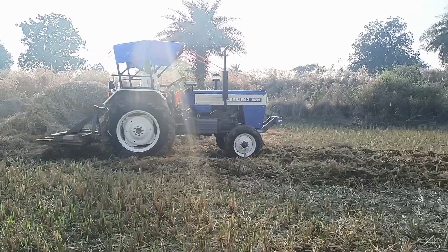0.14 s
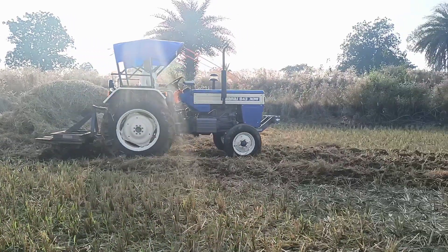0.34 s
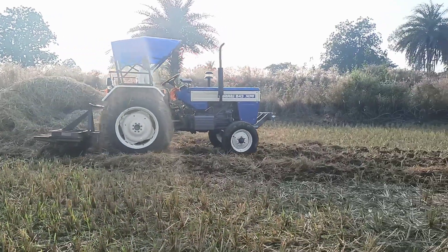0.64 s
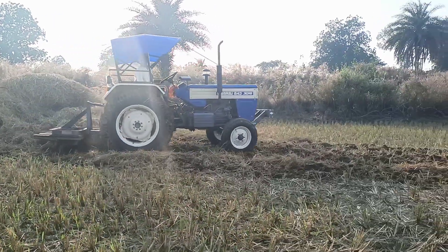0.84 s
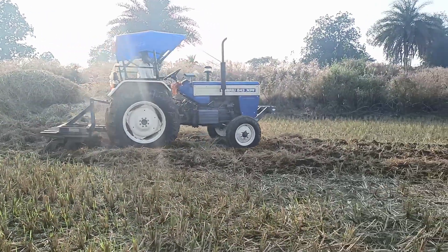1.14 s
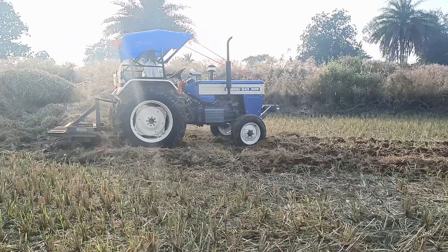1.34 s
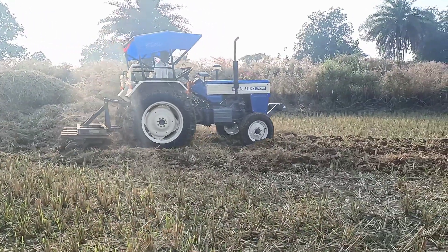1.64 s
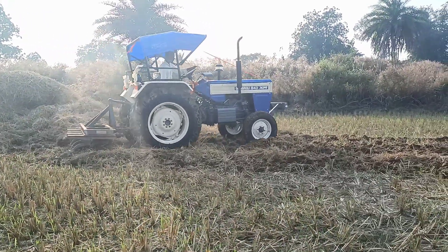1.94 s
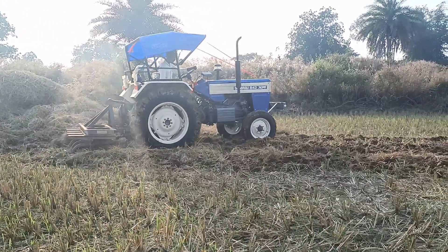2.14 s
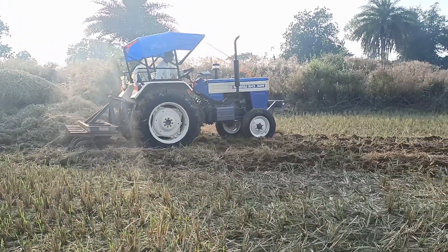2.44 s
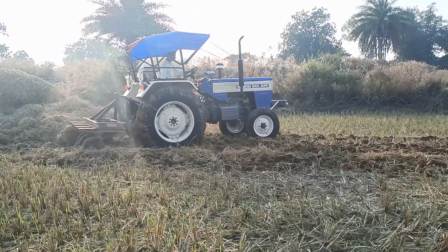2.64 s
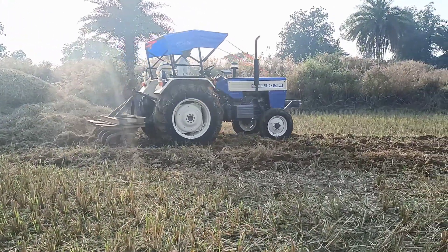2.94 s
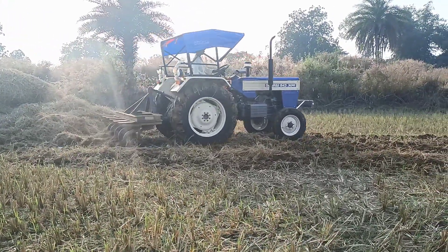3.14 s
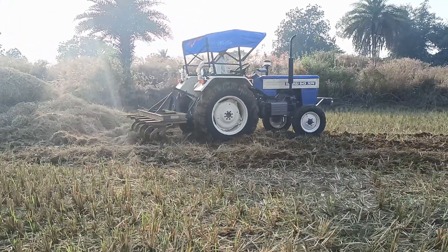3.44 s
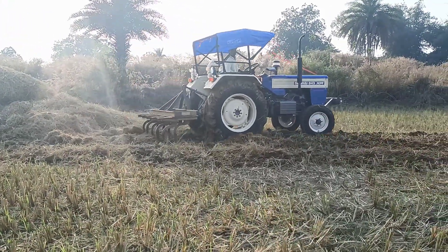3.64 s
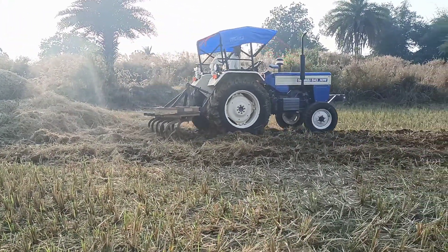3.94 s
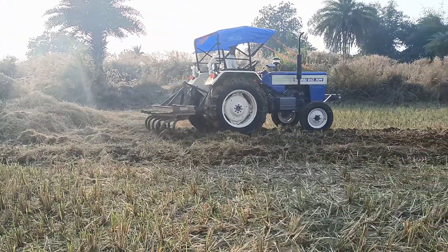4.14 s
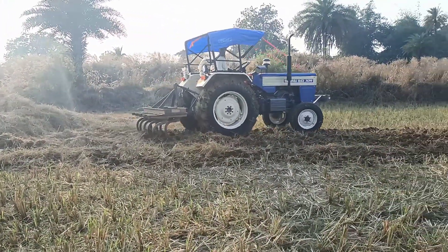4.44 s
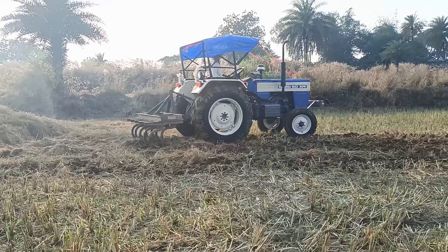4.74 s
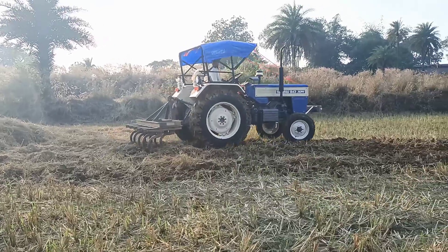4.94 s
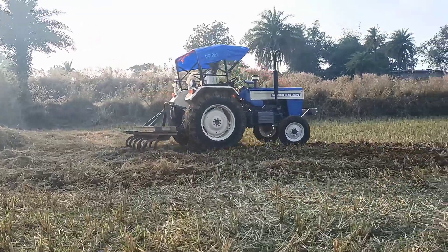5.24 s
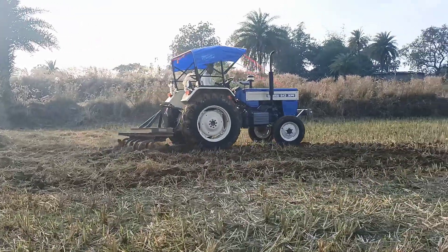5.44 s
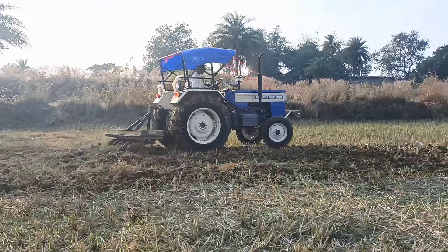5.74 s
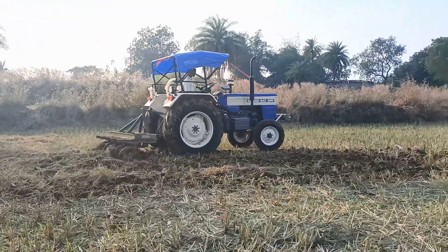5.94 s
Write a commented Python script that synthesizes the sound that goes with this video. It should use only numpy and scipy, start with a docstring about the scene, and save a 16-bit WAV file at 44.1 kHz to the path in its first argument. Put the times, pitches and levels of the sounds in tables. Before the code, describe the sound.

Steady heavy diesel chugging and rattling outdoors, easing for a second around a metallic clank, then gritty soil rushing over steel and a sharp stone click.

```python
"""Tractor and cultivator, open stubble field

From 19 m off and drawing slowly away, a diesel thumps and hisses through its stack with every firing, over block
rumble, clatter, a panel's hum and a gear whine. It labours, runs light for a second while the implement squeaks and
clanks, then digs in with a rush of soil. Pulses, shaped noise, sines and struck modes reach two microphone ports."""
import sys
import numpy as np
from scipy import signal
from scipy.fft import rfft, irfft
from scipy.io import wavfile
from scipy.ndimage import uniform_filter1d

SR = 44100
rng = np.random.default_rng(int(sys.argv[2]) if len(sys.argv) > 2 else 0)


def materialize(psi):
    """Save the field psi as 16-bit PCM at rate SR to the path in sys.argv[1].

    A 1-D psi becomes a single channel; in a 2-D psi each row is a channel.
    """
    bounded = np.clip(np.atleast_2d(psi).T, -1, 1)
    quanta = np.round(bounded * 32767).astype(np.int16)
    wavfile.write(sys.argv[1], SR, quanta)


N = 268569
TIME = np.arange(N) / SR
BINS = np.maximum(np.arange(N // 2 + 1) * SR / N, 1)


def from_db(db):
    """Decibels to gain."""
    return 10 ** (np.asarray(db) / 20)


def rms_one(x):
    """Scale to rms 1."""
    return x / np.sqrt(np.mean(x ** 2) + 1e-20)


def in_time(rows):
    """Each column of a curve at every sample."""
    s, *columns = np.transpose(rows)
    return [np.interp(TIME, s, c) for c in columns]


def in_frequency(rows):
    """Each column of a spectrum at every frequency bin, straight over log frequency."""
    hz, *columns = np.transpose(rows)
    return np.array([np.interp(np.log(BINS), np.log(hz), c) for c in columns])


def colour(x, spectrum):
    """Filter by a table of f/Hz and one or more columns of level/dB."""
    return irfft(rfft(x) * from_db(in_frequency(spectrum)), N)


def butter(x, hz, kind, order=2):
    """Causal low-, high- or band-pass."""
    return signal.sosfilt(signal.butter(order, hz, kind, fs=SR, output="sos"), x)


def resonate(x, hz, width_hz):
    """One resonance with gain 1 on top."""
    r = np.exp(-np.pi * width_hz / SR)
    numerator = np.array([1, 0, -1]) * (1 - r * r) / 2
    denominator = [1, -2 * r * np.cos(2 * np.pi * hz / SR), r * r]
    return signal.lfilter(numerator, denominator, x + 1e-18)


def drift(rate, time=TIME):
    """Smooth chance with rms 1 that changes about rate times a second."""
    knots = rng.standard_normal(int(TIME[-1] * rate) + 3)
    return rms_one(np.interp(time * rate + rng.random(), np.arange(len(knots)), knots))


# likeness of the sound at the two microphone ports: (f/Hz, left-right correlation)
PORT_LIKENESS = [(150, 0.99), (500, 0.94), (1000, 0.82), (2000, 0.66), (4000, 0.069), (9000, -0.053)]


def air_noise():
    """White stereo noise, alike in the bass and nearly unrelated in the treble."""
    alike = in_frequency(PORT_LIKENESS)
    mid, side = rfft(rng.standard_normal((2, N)))
    left_right = np.sqrt(1 + alike) * mid + np.sqrt(1 - alike) * side * [[1], [-1]]
    return irfft(left_right, N) / np.sqrt(2)


def dying(start_s, t60, rise_s, hold_s=0):
    """Envelope that rises quickly, holds and dies by 60 dB in t60 seconds."""
    age = np.maximum(TIME - start_s, 0)
    decay = np.exp(-np.log(1000) * np.maximum(age - hold_s, 0) / t60)
    return (1 - np.exp(-age / rise_s)) * decay


def swell(start_s, end_s, time=TIME):
    """Rounded envelope that rises and falls between two times."""
    progress = np.clip((time - start_s) / (end_s - start_s), 0, 1)
    return np.sqrt(np.abs(np.sin(np.pi * progress)))


def swells(rows):
    """Summed envelope of a table of (start t/s, end t/s, level/dB)."""
    return sum(from_db(level_db) * swell(start, end) for start, end, level_db in rows)


def narrow_tones(rows):
    """Rough tones: noise through two equal narrow resonances in a row, swelling and fading."""
    out, noise = np.zeros((2, N)), air_noise()
    for start, end, hz, width_hz, level_db in rows:
        near = (TIME > start) & (TIME < end)
        stage_hz = width_hz * 0.84
        tone = resonate(resonate(noise, hz, stage_hz), hz, stage_hz)[:, near]
        out[:, near] += from_db(level_db) * swell(start, end, TIME[near]) * rms_one(tone)
    return out


def firing_times(cycles):
    """One firing in the middle of each cycle."""
    return np.interp(np.arange(int(cycles[-1] + .5)) + .5, cycles, TIME)


def bursts(times, level_db, rise_s, fall_s):
    """One Gaussian hump per event, with its own rise and fall."""
    out = np.zeros(N)
    for s, gain in zip(times, from_db(level_db)):
        near = slice(max(int(s * SR) - SR // 40, 0), int(s * SR) + SR // 40)
        age = TIME[near] - s
        out[near] += gain * np.exp(-.5 * (age / np.where(age < 0, rise_s, fall_s)) ** 2)
    return out


# how the engine answers the pull; thump, hiss and clatter get further gain in scene(), boom is against the bare pulse:
# (load 0-1, exhaust thump level/dB, silencer boom level/dB, gas hiss level/dB, block rumble level/dB, clatter level/dB)
ENGINE_EFFORT = [(0, -39.5, -22, -56.5, -32, -39.5), (.25, -33.5, 5.5, -54, -34, -38.5),
                 (.5, -29.5, 4.5, -46.5, -32.5, -37), (1, -24, -12.5, -36.5, -35, -37.5)]


def under_load(load):
    """Levels of thump, boom, hiss, rumble and clatter at this load."""
    loads, *columns = np.transpose(ENGINE_EFFORT)
    return [np.interp(load, loads, c) for c in columns]


def thump(times, strength_db, boom_db, stack_hz=136, stack_width_hz=42, stack_db=4.0, low_cut_hz=18,
          boom_hz=92, boom_width_hz=40):
    """Pressure pulses set the air in the stack and the silencer swinging; the running rms is held at 1."""
    pulse = -bursts(times, strength_db, rise_s=0.0021, fall_s=.0019)
    pulse = butter(pulse - pulse.mean(), low_cut_hz, "high", order=1)
    swing = from_db(stack_db) * resonate(pulse, stack_hz, stack_width_hz)
    boom = from_db(boom_db) * resonate(pulse, boom_hz, boom_width_hz)
    wave = pulse + swing + boom
    return wave / np.sqrt(uniform_filter1d(wave ** 2, size=12000))


# spectrum of the exhaust gas: (f/Hz, relative level/dB)
GAS_SPECTRUM = [(350, -20.5), (550, 2), (750, 0), (980, -6.5), (1230, -2), (1450, -15), (1800, 1),
                (2100, -6), (2400, 4.5), (3300, -11), (4200, -12.5), (6000, -5), (9500, -10.5),
                (15000, -3.5)]
# shape of one puff by frequency: (f/Hz, crest after the firing t/ms, rise t/ms, fall t/ms, relative level between puffs/dB)
PUFF_SHAPE = [(500, -1.0, 3.5, 3.8, -24), (2500, -0.4, 1.9, 3.6, -6), (6030, -0.8, 2.5, 7.1, -12.5),
              (9200, -2.4, 1.8, 5.7, -7.5), (15000, -3.5, 0.9, 2.2, -8.5)]


def gas(times, strength_db, loaded, vary_db=2.5, patchy_db=1.08):
    """Each puff starts as a fine hiss and swells into a coarser rasp of its own colour; unloaded, puffs merge."""
    edges_hz = [330, 900, 1500, 2100, 2900, 3800, 4800, 5800, 6900, 8200, 9600, 11200, 13200, 16500]
    noises = [rms_one(colour(air_noise(), GAS_SPECTRUM)) for _ in range(2)]
    puff_hz, *shape = np.transpose(PUFF_SHAPE)
    out = 0
    for k, band in enumerate(zip(edges_hz, edges_hz[1:])):
        crest_ms, rise_ms, fall_ms, between_db = [np.interp(np.mean(band), puff_hz, c) for c in shape]
        level_db = strength_db + rng.normal(0, vary_db, len(times))
        puffs = rms_one(bursts(times + crest_ms / 1000, level_db, rise_ms / 1000, fall_ms / 1000))
        puffs = rms_one(puffs + from_db(between_db))
        # blend in power between separate puffs and a steady stream
        gate = np.sqrt(loaded * puffs ** 2 + 1 - loaded)
        out = out + butter(noises[k % 2], band, "band") * gate * from_db(patchy_db * drift(8))
    return out


def hiss_grain(times, cycles, low_hz=5500, high_hz=13000, spread_db=3.5, count=4):
    """Short tones at random pitches, drawn anew for each firing, give the treble of the hiss a patchy grain."""
    firing, out = cycles.astype(int), np.zeros((2, N))
    for k in range(2 * count):  # alternately left and right
        hz = rng.uniform(low_hz, high_hz, len(times) + 2)[firing]
        level_db = rng.normal(0, spread_db, len(times))
        gate = bursts(times - .0015, level_db, rise_s=.0015, fall_s=.003)
        out[k % 2] += gate * np.sin(2 * np.pi * hz * TIME)
    return rms_one(out)


def firing_shakes(times):
    """Every firing shakes the stack and the gears by a different amount."""
    return rms_one(bursts(times, rng.normal(0, 3, len(times)), rise_s=.002, fall_s=.004) + .15)


# narrow rings of the stack that come and go, before the firings shake them:
# (start t/s, end t/s, f/Hz, width f/Hz before the 0.84 of each stage, level/dB)
STACK_RING_TONES = [(-.1, .35, 6030, 129.6, -40), (.95, 1.45, 6116, 101.9, -33.5),
                    (.95, 1.5, 5680, 270, -41), (1.8, 3.0, 6560, 240, -37)]


def stack_rings(shakes):
    """The stack rings in narrow bands of noise, pulsing with the firings."""
    return shakes * narrow_tones(STACK_RING_TONES)


# spectrum of the shaking block: (f/Hz, relative level/dB)
BLOCK_SPECTRUM = [(60, -12), (110, -5.5), (160, 1), (200, -0.5), (250, -4), (310, -13), (420, -35),
                  (900, -51)]


def rumble(cycles, waver_rad=0.62, regular_share=.6):
    """The block shakes in a pattern that repeats every four firings, and wavers, over bass noise."""
    time, turns = TIME[::8], cycles[::8] / 4  # low orders need few samples
    orders = 0
    for k in range(6, 36):
        phase = 2 * np.pi * (k * turns + rng.random()) + waver_rad * drift(5, time)
        orders = orders + np.cos(phase)
    shake = rms_one(colour(np.interp(TIME, time, orders), BLOCK_SPECTRUM))
    noise = rms_one(colour(air_noise(), BLOCK_SPECTRUM))
    return np.sqrt(regular_share) * shake + np.sqrt(1 - regular_share) * noise


# spectrum of the ringing crankcase: (f/Hz, relative level/dB)
CRANKCASE_SPECTRUM = [(350, -3.5), (550, -2), (750, 0), (980, -3), (1230, -1), (1450, -12.5), (1800, -1.5),
                      (2100, -6.5), (2400, -3.5), (3300, -9.5), (4200, -19), (6000, -20.5), (9500, -23.5),
                      (15000, -18.5)]


def clatter(cycles, rattle_db=5.0, tick_share=0.27):
    """Valves and injectors tick three times per firing, unevenly, and swell the crankcase noise."""
    ticks = firing_times(cycles * 3)
    ticks = ticks + rng.normal(0, 0.00078, len(ticks))
    rattle = bursts(ticks, rng.normal(0, rattle_db, len(ticks)), rise_s=0.00019, fall_s=0.0076)
    ringing = butter(colour(air_noise(), CRANKCASE_SPECTRUM), 287, "high")
    return rms_one(ringing * (1 + tick_share * rattle))


# a body panel sings along for a while: (start t/s, end t/s, peak level/dB)
PANEL_SWELLS = [(-.08, .21, -31), (1.75, 2.45, -38.5), (5.8, 6.02, -33)]


def panel_hum(panel_hz=724):
    """One lightly damped sheet-metal mode, a sine unsteady in level and pitch."""
    tone = np.sin(2 * np.pi * panel_hz * TIME + 0.41 * drift(15))
    return swells(PANEL_SWELLS) * (1 + 0.25 * drift(30)) * tone


# the gears whine for a while: (start t/s, end t/s, peak level/dB before throb and flutter)
WHINE_SWELLS = [(2.3, 2.7, -44), (2.65, 3.05, -38), (3.95, 4.5, -57), (5.83, 5.92, -31), (5.92, 6.15, -40)]


def gear_whine(cycles, shakes, teeth_per_firing=76.3, throb_share=0.29):
    """Meshing teeth sing at a fixed multiple of the firing rate, throbbing with the firings, unsteady in pitch."""
    jolt_rad = 1.1 * drift(70)
    throb = 1 + throb_share * (shakes - 1)
    flutter = 1 + .5 * drift(24.86)
    return swells(WHINE_SWELLS) * throb * flutter * np.sin(2 * np.pi * teeth_per_firing * cycles + jolt_rad)


# squeaks of the linkage: (start t/s, end t/s, f/Hz, width f/Hz before the 0.84 of each stage, level/dB)
LINKAGE_SQUEAKS = [(2.76, 2.95, 2760, 160, -38), (2.835, 2.885, 2630, 180, -30),
                   (3.652, 3.7, 3540, 90, -36), (3.675, 3.715, 3820, 120, -38.5),
                   (3.92, 3.965, 3760, 200, -39), (3.965, 4.0, 3600, 110, -41),
                   (5.138, 5.168, 3863, 200, -30.5), (5.19, 5.22, 3470, 150, -35),
                   (5.31, 5.37, 2400, 350, -34), (5.435, 5.48, 2620, 170, -27.5),
                   (5.44, 5.5, 2270, 90, -26.5), (5.915, 5.955, 2360, 350, -26.5),
                   (5.995, 6.04, 2350, 350, -29), (6.06, 6.1, 2280, 500, -32)]


def squeaks():
    """The linkage squeaks in short, rough, narrow bands of noise."""
    return narrow_tones(LINKAGE_SQUEAKS)


# the implement knocks against its hitch: (t/s, level/dB before the crash and ring gains)
HITCH_KNOCKS = [(3.706, -34), (3.71, -23.5), (3.718, -34), (3.729, -29), (3.746, -32.5)]
# modes of the steel frame: (f/Hz, relative level/dB, t60/s)
FRAME_MODES = [(687, -3, 0.11), (1200, 2, 0.09), (1280, -2, 0.072), (1600, -5, 0.051), (1820, 1, 0.087),
               (2270, -6, 0.17), (2470, 3.5, 0.05), (2710, -18, 0.12), (3150, -23, 0.036),
               (3600, -23, 0.077)]


def clank(crack_db=3.0, ring_db=-3.5):
    """Each knock gives a short crash and strikes every mode of the frame with a strength of its own."""
    times, level_db = np.transpose(HITCH_KNOCKS)
    ring = np.zeros((2, N))
    for hz, mode_db, t60 in FRAME_MODES:
        strike_db = level_db + mode_db + ring_db + rng.normal(0, 2.9, (2, len(times)))
        clicks = np.zeros((2, N))
        clicks[:, (times * SR).astype(int)] = from_db(strike_db)
        r, w = np.exp(-np.log(1000) / (t60 * SR)), 2 * np.pi * hz / SR
        ring += signal.lfilter([0, np.sin(w)], [1, -2 * r * np.cos(w), r * r], clicks + 1e-18)
    crash = rms_one(butter(butter(air_noise(), 750, "high"), 2200, "low", order=3))
    cracks = sum(from_db(db) * dying(s, 0.051, 0.00061) for s, db in HITCH_KNOCKS)
    return ring + from_db(crack_db) * crash * cracks


# spectrum of soil and straw on steel: (f/Hz, relative level/dB)
SOIL_SPECTRUM = [(1500, -8), (3000, -3.5), (4500, -14.5), (6000, -2), (8000, -14), (10000, -9), (11800, -4),
                 (13400, 8), (14600, 6), (15800, -10)]
# tines rush through soil and straw: (t/s, level/dB, t60/s)
TINE_SCRAPES = [(4.72, -36.5, 1.1), (5.13, -26.5, 0.37), (5.2, -29.5, 0.7), (5.4, -22, 1.1),
                (5.62, -24, .55), (5.92, -31.5, 2.3)]
# stones click on the tines: (t/s, level/dB before the quick rise, t60/s)
STONE_CLICKS = [(5.218, -17, .005), (5.4148, -10.5, .006)]


def tines(grain_db=2.5, lumps_db=2.5, rise_s=0.0092, hold_s=0.043):
    """Gritty, lumpy rushes of soil over steel, and a stone now and then, all as shaped noise."""
    grit = rms_one(from_db(grain_db * drift(500) + lumps_db * drift(60)))
    power = sum((from_db(db) * dying(s, t60, rise_s, hold_s)) ** 2 for s, db, t60 in TINE_SCRAPES)
    stones = sum(from_db(db) * dying(s, t60, rise_s=.0002) for s, db, t60 in STONE_CLICKS)
    return rms_one(colour(air_noise(), SOIL_SPECTRUM)) * (grit * np.sqrt(power) + stones)


def over_ground(x, start_m=19, away_m_per_s=0.22, lift=0.35, loss_per_m=0.49, dip_hz=390, dip_width_hz=220):
    """Sound fades with distance; the soil's reflection lifts the low mids at first, cancels them further off."""
    gone_m = away_m_per_s * TIME
    reflection = (lift - loss_per_m * gone_m) * resonate(x, dip_hz, dip_width_hz)
    return (x + reflection) * start_m / (start_m + gone_m)


# engine speed: (t/s, firings per s)
ENGINE_SPEED = [(0.0, 43.57), (0.45, 47.17), (0.59, 45.18), (1.35, 43.78), (1.55, 45.82), (1.85, 44.03),
                (2.33, 44.04), (2.84, 35.91), (3.26, 40.56), (3.52, 51.03), (4.51, 48.29), (4.62, 41.73),
                (4.83, 47.84), (5.14, 45.19), (5.39, 49.49), (5.48, 44.87), (5.78, 45.59), (6.09, 42.7)]
# pull of the cultivator on the engine: (t/s, load 0-1)
CULTIVATOR_PULL = [(0, 0.91), (.28, 1), (.48, 0.4), (.62, 0.75), (.94, 1), (1.6, .93), (3.47, 0.87),
                   (3.54, 0.04), (3.63, .38), (3.78, 0), (4.64, 0.15), (4.72, 0.54), (4.9, 0.36),
                   (5.05, 0.34), (5.34, .55), (5.45, 0.2), (5.76, 0.88), (6.09, 0.99)]


def scene(thump_gain_db=0.43, gas_gain_db=11.0, clatter_gain_db=3.5, idle_db=-55.5, full_db=-50.0,
          uneven_db=-1.06, crackle_db=0.73, grain_db=-11.0, working_rate_per_s=45,
          thump_db_per_octave=18, rumble_db_per_octave=12.5):
    """Engine and implement in an open field; speed and load drive the engine's thump, gas, rumble and clatter."""
    speed, load = in_time(ENGINE_SPEED)[0], in_time(CULTIVATOR_PULL)[0]
    thump_db, boom_db, gas_db, rumble_db, clatter_db = under_load(load)
    cycles = .42 + np.cumsum(speed) / SR  # firings so far
    times = firing_times(cycles)
    # the four cylinders fire a little unequally
    strength_db = uneven_db * np.cos(np.pi / 2 * np.arange(len(times))) + rng.normal(0, 1.0, len(times))
    shakes = firing_shakes(times)

    # thump and rumble weaken as the engine is dragged below its working speed
    octaves = np.minimum(np.log2(speed / working_rate_per_s), 0)
    thump_level = from_db(thump_db + thump_gain_db + thump_db_per_octave * octaves)
    thumps = thump_level * thump(times, strength_db, boom_db)

    # hiss level before its gain decides how separate the puffs are
    loaded = np.clip((gas_db - idle_db) / (full_db - idle_db), 0, 1)
    grain = from_db(grain_db) * loaded * hiss_grain(times, cycles)
    jet = gas(times, strength_db, loaded) + grain
    hiss = from_db(gas_db + gas_gain_db + crackle_db * drift(1500)) * jet
    exhaust = thumps + hiss + stack_rings(shakes)

    block = from_db(rumble_db + rumble_db_per_octave * octaves) * rumble(cycles)
    crankcase = block + from_db(clatter_db + clatter_gain_db) * clatter(cycles)
    implement = squeaks() + clank() + tines()
    return over_ground(exhaust + crankcase + panel_hum() + gear_whine(cycles, shakes) + implement)


# colour of the two microphone ports: (f/Hz, left level/dB, right level/dB)
PORT_COLOUR = [(300, 1, 0.5), (780, -1, -2), (1003, -11.5, -6), (1188, 2, 2), (1440, 2.5, 2),
               (2450, 4.5, -3.5), (4390, 6.5, 5.5), (6570, 4.5, -5), (7340, 3, -4.5), (8090, -15, 9),
               (9460, 6, 5), (11940, 2, 3), (13800, 2.5, -20), (14800, 2, -35)]


def record(dry, cutoff_hz=15700):
    """Each microphone port colours the sound in its own way; the deepest bass and the top are cut."""
    heard = colour(dry, PORT_COLOUR)
    heard = colour(heard, [(18, -20), (36, 0), (60, 0)])  # f/Hz, level/dB
    return signal.sosfilt(signal.ellip(12, .2, 90, cutoff_hz, fs=SR, output="sos"), heard)


dry = scene()
out = record(dry)
materialize(out)
```